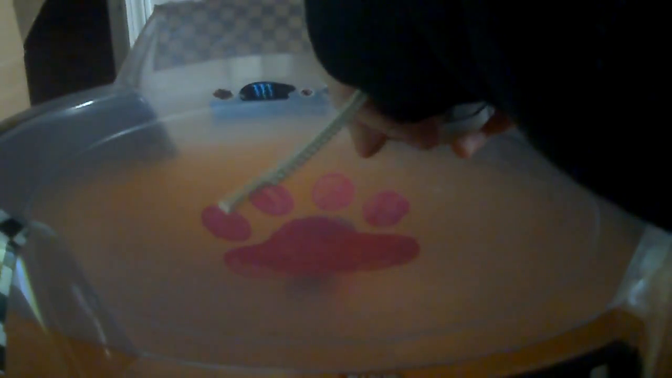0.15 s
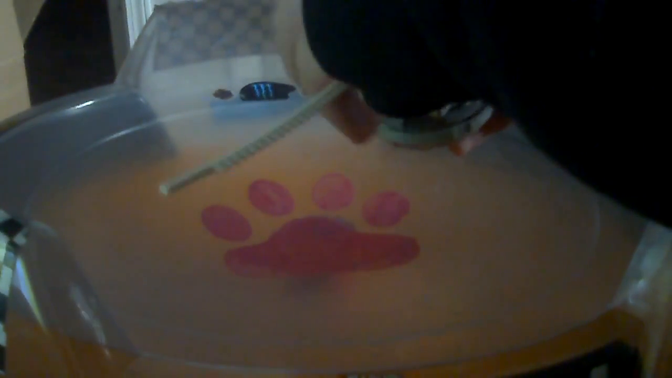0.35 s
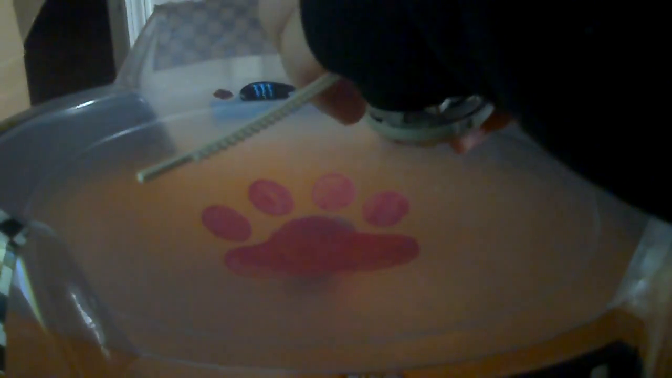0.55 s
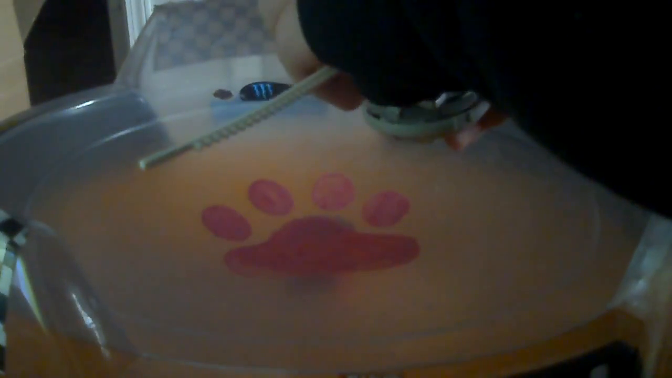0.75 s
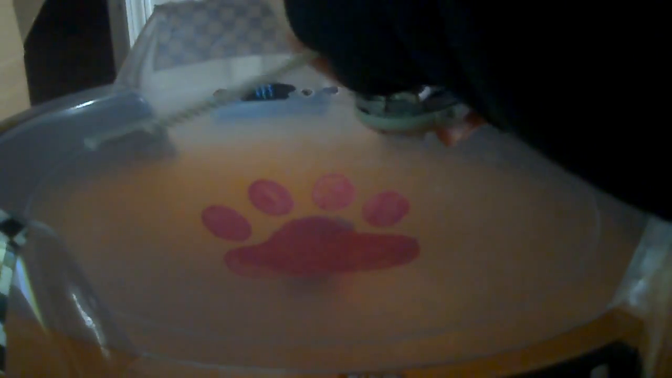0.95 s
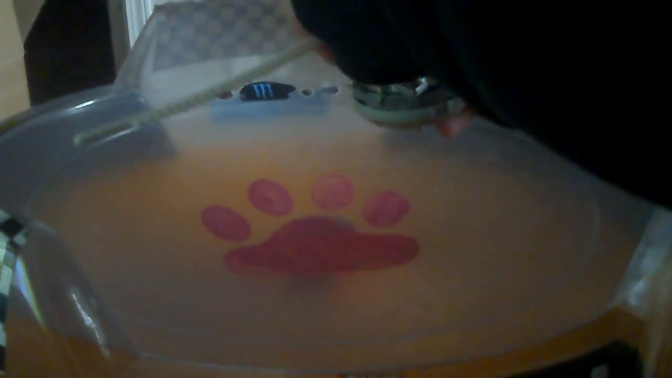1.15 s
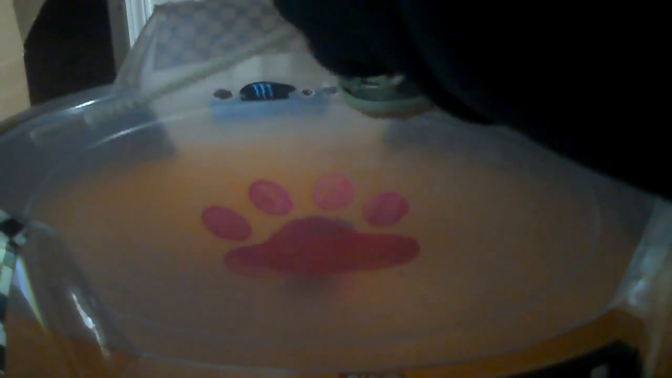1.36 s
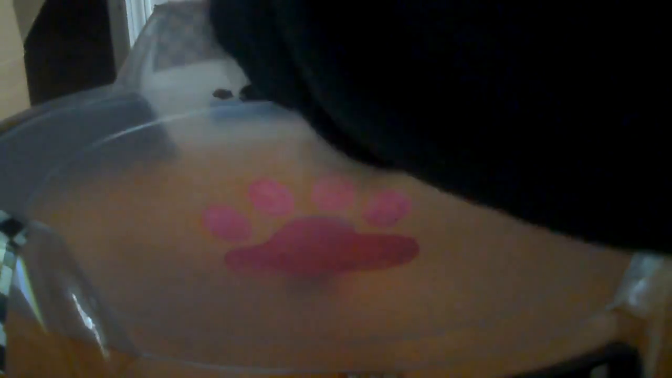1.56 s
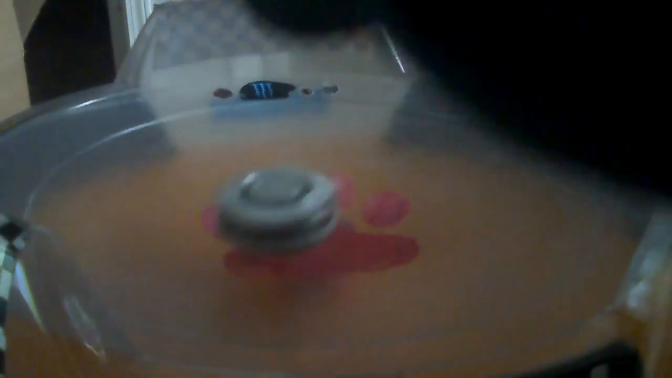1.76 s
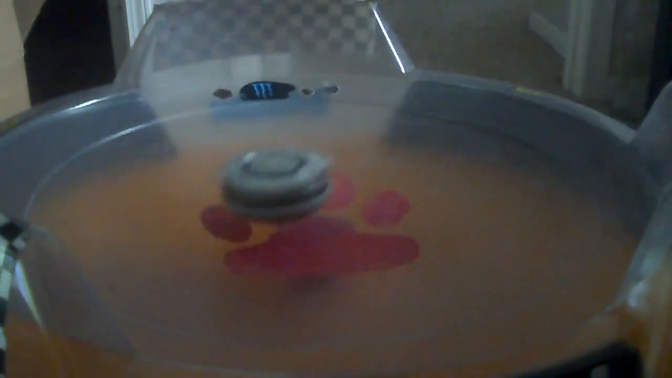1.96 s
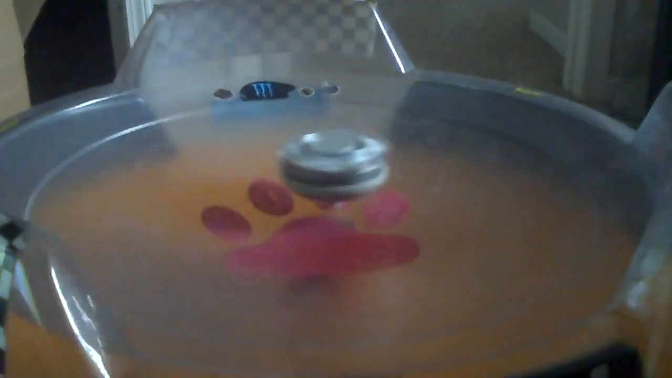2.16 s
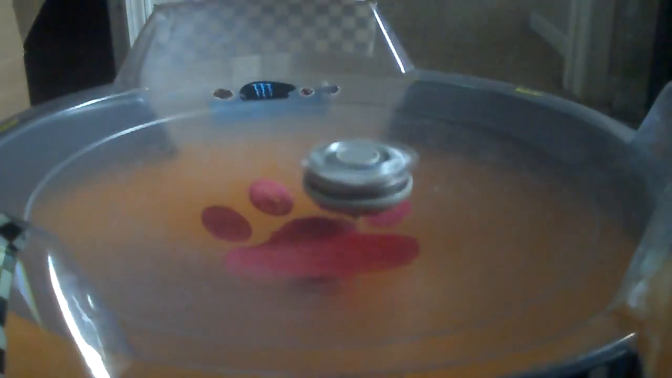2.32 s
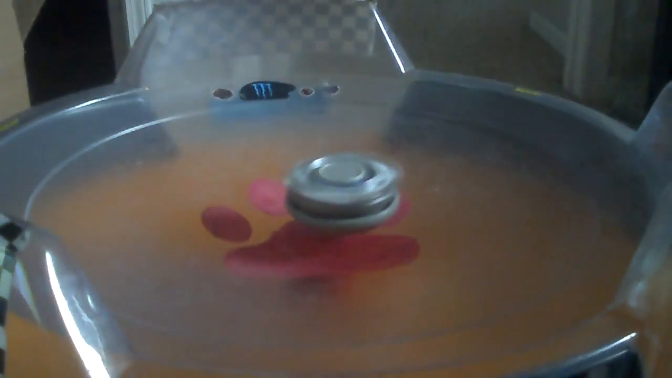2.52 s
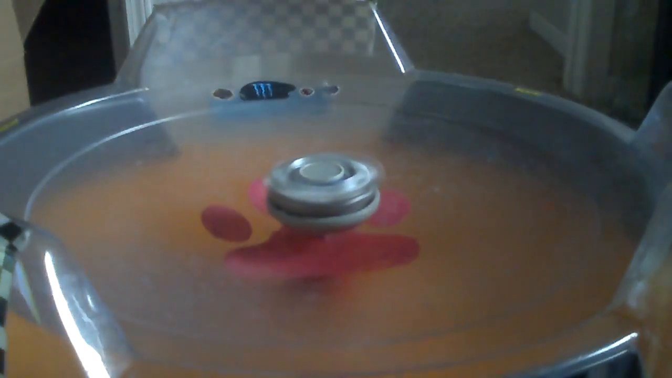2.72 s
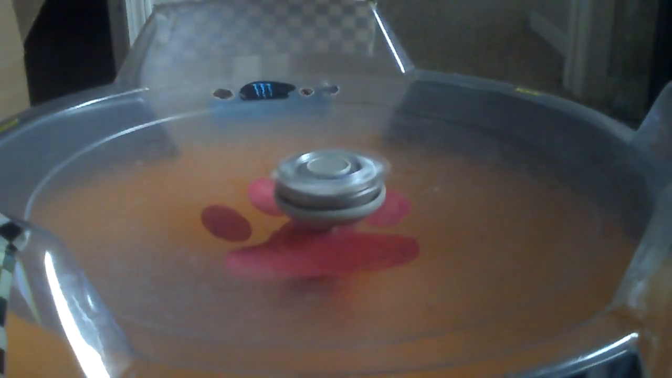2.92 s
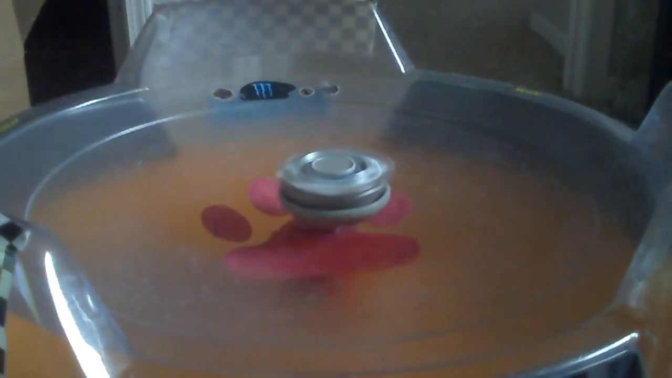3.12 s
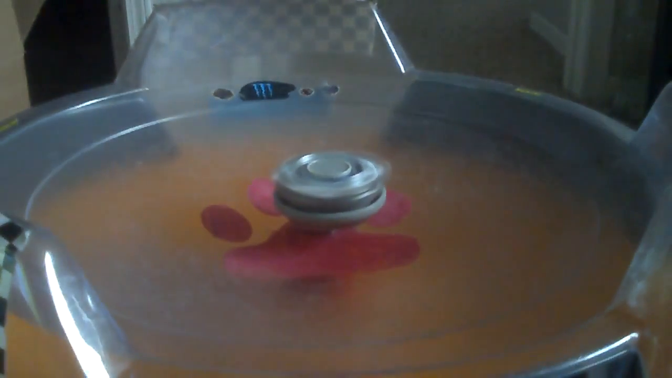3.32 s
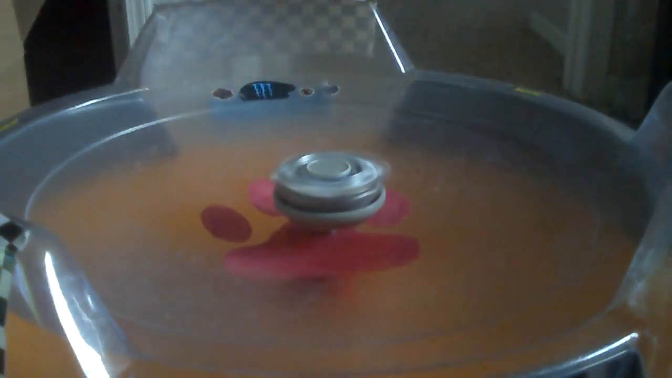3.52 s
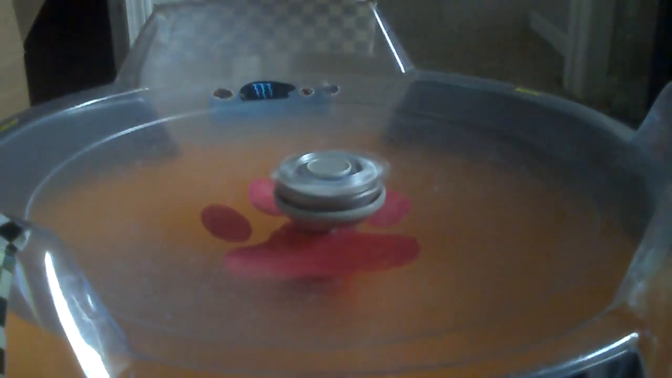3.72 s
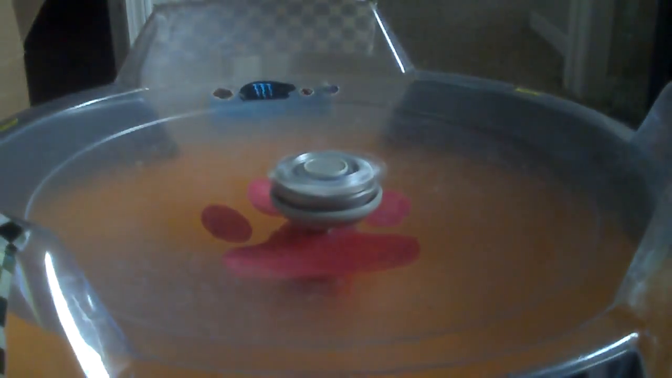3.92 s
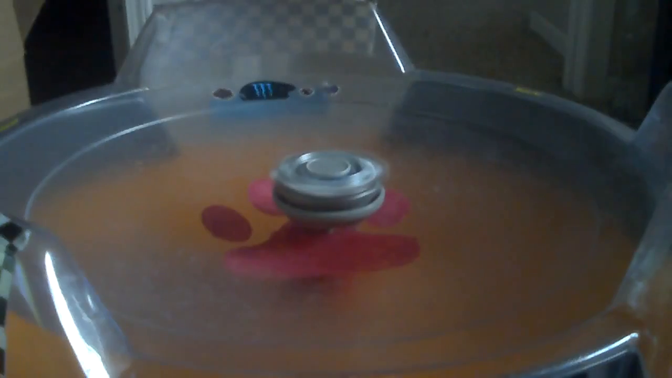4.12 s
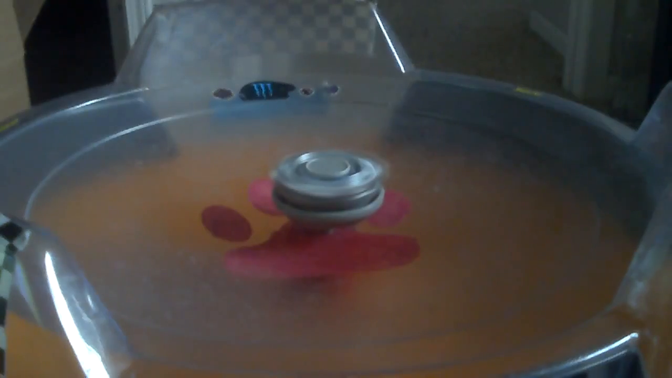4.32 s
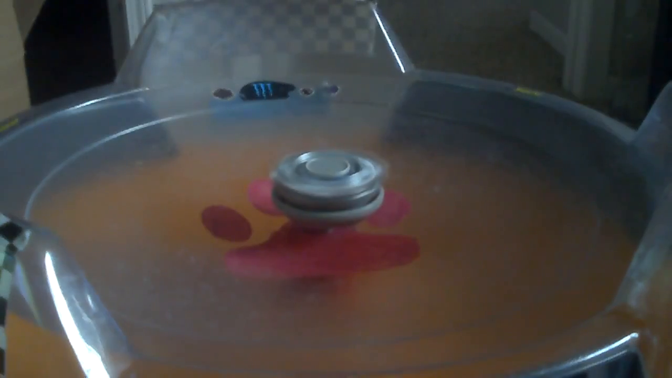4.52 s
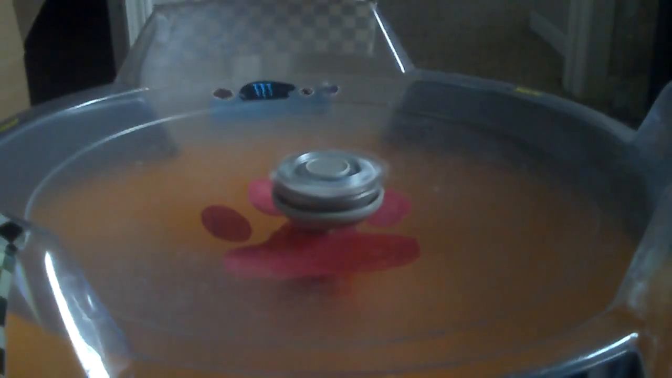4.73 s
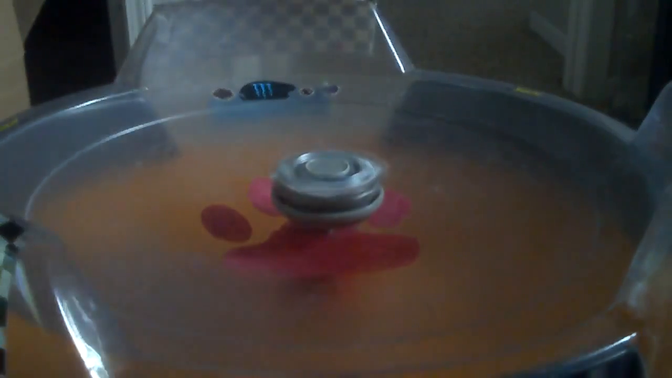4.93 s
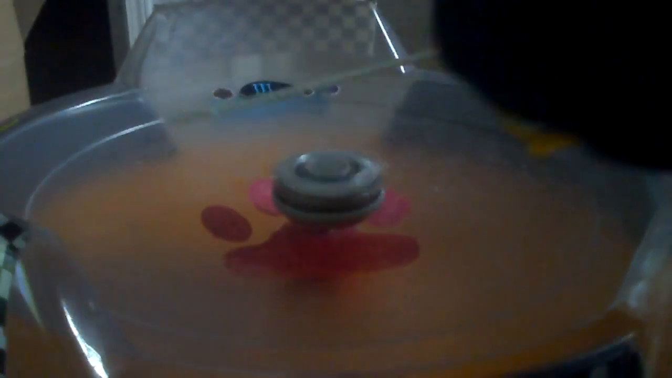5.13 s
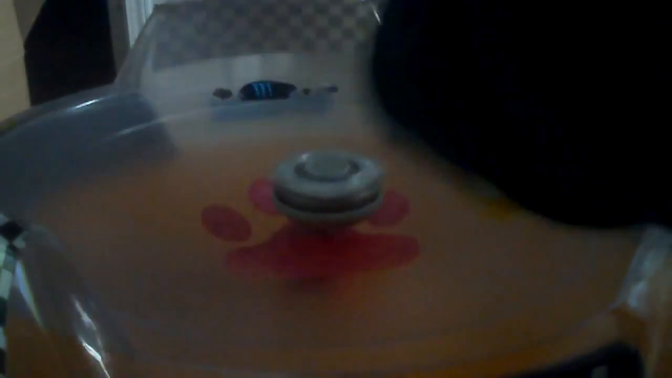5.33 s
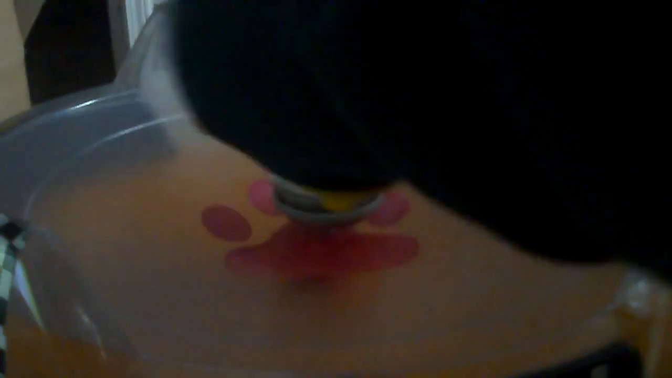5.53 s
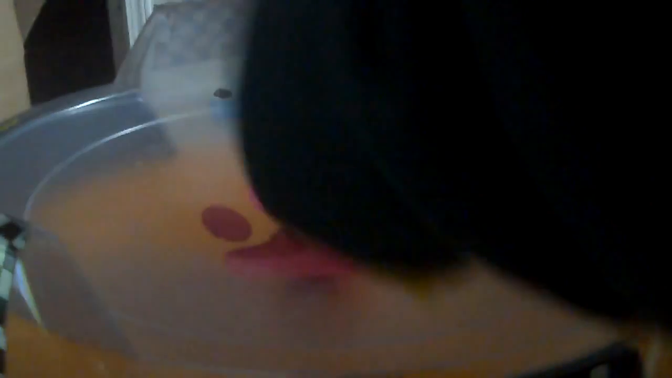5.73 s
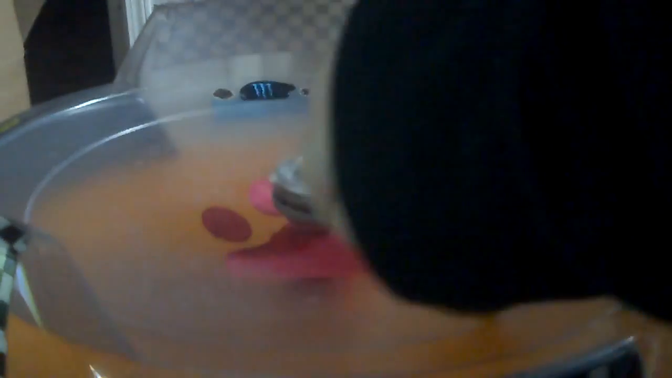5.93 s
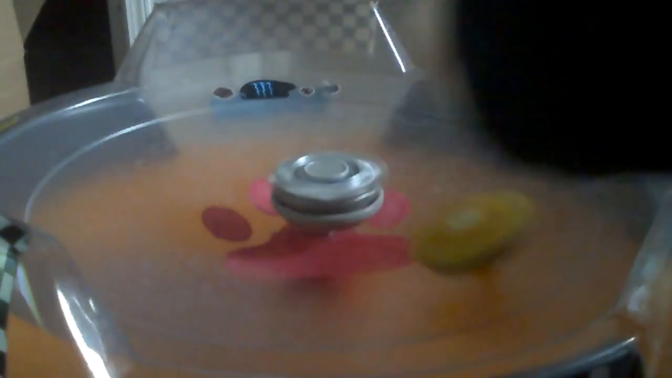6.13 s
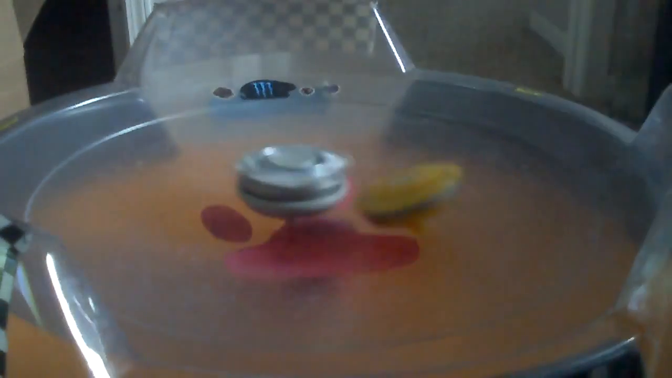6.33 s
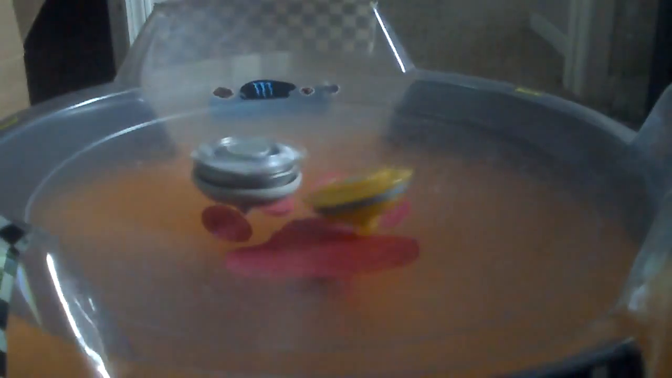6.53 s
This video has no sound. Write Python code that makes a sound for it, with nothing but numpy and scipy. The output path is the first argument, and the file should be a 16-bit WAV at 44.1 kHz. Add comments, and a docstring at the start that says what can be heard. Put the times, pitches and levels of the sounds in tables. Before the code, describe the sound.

Quiet indoor air, then a rising toothy zip and hard plastic clack as a spinning top drops into a hollow plastic arena. Bright rattling and low thumps settle into light hissing with rhythmic scrapes, quickening to a rough whirr. Small dull knocks pass nearby. A second ripcord pull and freewheeling gear lead to another, duller clatter and two brief hard clashes. The microphone is close, slightly harsh and hollow, with little echo.

```python
"""Quiet room air with mains hum, then small clicks of plastic launchers close to the microphone.
A ripcord zips; a toy top lands in a thin plastic dish, clatters and rocks, then scrapes once a lap,
faster and faster. A second launcher whirrs, its top clatters into the dish, and the two clash twice.
Shaped noise makes the friction, rattle and knocks; decaying modes make dish, tops and housing ring."""
import sys
import numpy as np
from scipy import signal
from scipy.fft import rfft, irfft
from scipy.io import wavfile

SR = 44100
rng = np.random.default_rng(int(sys.argv[2]) if len(sys.argv) > 2 else 0)


def materialize(psi):
    """Save the field psi as 16-bit PCM at rate SR to the path in sys.argv[1].

    A 1-D psi becomes a single channel; in a 2-D psi each row is a channel.
    """
    bounded = np.clip(np.atleast_2d(psi).T, -1, 1)
    quanta = np.round(bounded * 32767).astype(np.int16)
    wavfile.write(sys.argv[1], SR, quanta)


N = 289737
TIME = np.arange(N) / SR

# The first top's spin. Each row: time in seconds, turns per second.
SPIN = [(1.7, 82), (2.2, 77), (2.44, 70), (2.8, 68), (6.57, 74)]
# Laps of the scrape. Each row: time in seconds, laps per second.
LAPS = [(2.609, 6.01), (2.95, 11.4), (3.35, 17.04), (3.7, 20.29), (4.2, 26.42), (4.7, 31.88), (5.37, 38.17),
        (6.57, 44.0)]
# Modes of the dish. Each row: frequency in Hz, relative energy in dB, t60 in seconds.
DISH_MODES = [(82, -35.5, .12), (143.1, 0.5, 0.31), (169.4, -4, 0.39), (217.4, -1, 0.34),
              (302.4, -8.5, 0.2), (343, -7, 0.17), (380, -8.5, 0.35), (433.3, -2, 0.12),
              (465.3, -0.5, 0.18), (508.3, 1.5, 0.17), (540, -4.5, 0.14), (617, -8.5, 0.13),
              (696, -4.5, 0.18), (766, -9, 0.11), (936, -5, 0.091), (1016, -4.5, 0.023), (1118, -14, 0.42)]
# Modes of a top's body. Each row: frequency in Hz, relative energy in dB, t60 in seconds.
TOP_MODES = [(3150, 0, 0.03), (5260, 4, 0.023), (5730, -3, 0.0075), (7000, -17, 0.047), (8900, -22, 0.012),
             (10250, -10, 0.013)]
# Colour of the dish's dense wash and thump. Each row: frequency in Hz, relative density in dB per Hz.
SHELL_COLOUR = [(25, -22), (55, -32), (90, 0.5), (140, 7.5), (260, -3), (500, 10), (800, -12.5), (1100, 1),
                (1300, -3), (2200, -3), (4000, -34)]
# Bright clatter of the heavy top. Each row: frequency in Hz, relative density in dB per Hz.
HEAVY_CLATTER = [(700, 0.5), (1900, -3), (4400, 1.5), (5600, 9.5), (7000, 7), (9800, 4.5), (12000, -11),
                 (15000, -20)]

# the first, heavy top lands and rocks until upright; the light one lands and tumbles onto its tip
HEAVY_LANDS_S, UPRIGHT_S, LIGHT_LANDS_S, TUMBLE_ENDS_S = 1.7134, 2.4364, 5.9984, 6.105
REFERENCE_LAPS_PER_S = 30  # lap rate at which the hiss and scrape levels are given


def undb(db):
    """Decibels to gain."""
    return 10 ** (np.asarray(db) / 20)


def unit(x):
    """Scale to rms 1."""
    return x / np.sqrt(np.mean(x ** 2))


def loudness(rows, axis=1):
    """Gain along a dB column of a curve; silent outside it, but held if it reaches the end."""
    rows = np.array(rows)
    after = -140 if rows[-1, 0] < TIME[-1] - .1 else None
    return undb(np.interp(TIME, rows[:, 0], rows[:, axis], left=-140, right=after))


def cycles(rows):
    """Turns counted along a curve of rates, from its first row on."""
    rows = np.array(rows)
    rate = np.interp(TIME, rows[:, 0], rows[:, 1], left=0)
    return np.cumsum(rate) / SR


def ring(x, response):
    """Send x through a response scaled to unit energy."""
    return signal.fftconvolve(x, response / np.linalg.norm(response))[:len(x)]


def colour(x, points, size=2048):
    """Causal minimum-phase filter of unit energy, shaped through (Hz, dB) points."""
    hz, db = np.transpose(points)
    grid = np.maximum(np.fft.rfftfreq(size, 1 / SR), 1)
    level_db = np.interp(np.log(grid), np.log(hz), db)
    cepstrum = irfft(np.log(undb(level_db)))
    cepstrum[1:size // 2] *= 2  # fold the cepstrum forward in time
    cepstrum[size // 2 + 1:] = 0
    return ring(x, irfft(np.exp(rfft(cepstrum))))


def modes(rows):
    """Impulse response of decaying modes; dB sets the relative energy of each."""
    t = TIME[:SR // 2]
    out = np.zeros(len(t))
    for k, (hz, db, t60) in enumerate(rows):
        decay = np.exp(-np.log(1000) * t / t60)
        out += (-1) ** k * undb(db) / np.sqrt(t60) * np.sin(2 * np.pi * hz * t) * decay
    return out


def tail(t60):
    """Impulse response of many dense modes or reflections."""
    t = TIME[:SR // 2]
    return rng.standard_normal(len(t)) * np.exp(-np.log(1000) * t / t60)


def flutter(rate, spread_db):
    """A gain that wanders at random, rate steps a second, with mean power 1."""
    steps = np.interp(TIME * rate, np.arange(N), rng.standard_normal(N))
    return unit(undb(spread_db * steps))


def grit(spread_db):
    """Countless tiny contacts of uneven force, as noise."""
    return rng.standard_normal(N) * flutter(2000, spread_db)


def each_turn(turns, decay, scatter_db):
    """A contact that bites once a turn and lets go, a little different every time."""
    force = undb(scatter_db * rng.standard_normal(N))[turns.astype(int)]
    return unit(force * np.exp(-(turns % 1) / decay))


def bursts(rows, release):
    """Envelope of contacts (s, dB, length s) that hold for their length and die away."""
    power = np.zeros(N + SR)
    t = TIME[:SR // 10]
    for s, db, length in rows:
        start = int(s * SR)
        envelope = undb(db) * np.exp(-np.maximum(t - length, 0) / release)
        power[start:start + len(t)] += envelope ** 2
    return np.sqrt(power[:N])


def swell(start, until, attack, release, sag_db_per_s):
    """Envelope that rises, sags steadily while the motion lasts and then dies away."""
    t = TIME - start
    rise = np.clip(t / attack, 0, 1)
    sag = undb(-sag_db_per_s * np.maximum(t - attack, 0))
    return rise * sag * np.exp(-np.maximum(TIME - until, 0) / release)


def room():
    """Quiet room air, as slowly wavering coloured noise, with a sine of mains hum."""
    # Room air. Each row: frequency in Hz, relative density in dB per Hz.
    air_colour = [(25, -71), (90, -6), (160, -1.5), (240, 3), (400, -4), (1000, -8.5), (1400, -13.5),
                  (1950, -14), (2400, -19), (5000, -23.5), (15000, -25.5)]
    air_db, hum_hz, hum_db = -50.5, 59.8, -57.5
    air = colour(rng.standard_normal(N), air_colour) * flutter(7.3, spread_db=1.44)
    hum = np.sqrt(2) * np.sin(2 * np.pi * hum_hz * TIME)
    return undb(air_db) * air + undb(hum_db) * hum


def launchers():
    """Clacks, ripcord pulls, freewheeling gear and a short plastic slide; the housing rings with them."""
    # Clicks and clacks. Each row: start in seconds, relative level in dB.
    clack_rows = [(0.294, -48.5), (1.2518, -40), (1.487, -42), (1.508, -36.5), (1.639, -1.5), (1.6703, -5),
                  (5.4006, 0.5), (5.407, 0.5), (5.4254, -4.5), (5.448, -8.5), (5.4819, -4.5), (5.4974, -7)]
    # Two ripcord pulls, each with rows: time in seconds, teeth per second, relative level in dB.
    pulls = [
        [(1.55, 338, -44), (1.59, 556, -26), (1.625, 710, -19.5), (1.66, 1010, -13.5), (1.68, 2370, -14),
         (1.7, 1220, -22.5), (1.74, 2300, -29.5), (1.79, 2900, -37)],
        [(5.33, 420, -37), (5.37, 780, -23.5), (5.41, 1160, -19), (5.45, 1060, -19.5), (5.5, 780, -30),
         (5.54, 2000, -53)],
    ]
    # The second launcher freewheels, top still on. Each row: time in seconds, relative level in dB.
    freewheel = [(5.4, -32), (5.45, -34), (5.58, -25), (5.72, -34.5), (5.85, -26.5), (5.99, -31.5),
                 (6.02, -35)]
    # Plastic slides on plastic. Each row: time in seconds, level in dB.
    slide_rows = [(3.1, -67), (3.17, -38), (3.222, -37.5), (3.243, -28), (3.28, -27), (3.3, -37.5),
                  (3.335, -30), (3.38, -73)]
    # Modes of the housing. Each row: frequency in Hz, relative energy in dB, t60 in seconds.
    housing_modes = [(1482, 9, 0.025), (1760, -1.5, 0.0084), (3420, -21, 0.035), (4190, 5.5, 0.024)]
    # Modes of a small catch. Each row: frequency in Hz, relative energy in dB, t60 in seconds.
    catch_modes = [(1870, 0, .03), (2170, -6, 0.028)]
    # Colours of whirr, clacks and slide. Each row: frequency in Hz, relative density in dB per Hz.
    whirr_colour, clack_colour, slide_colour = [(200, -21), (700, -17), (1200, -8), (1500, 10.5),
                                                (2000, 0.5), (2500, -2), (3400, -2), (4350, 7.5),
                                                (4900, -0.5), (6500, -10), (10500, -2.5), (14000, -33)], [(150, 3), (700, -11.5), (1200, -4),
                                                               (1900, 10.5), (2600, 1), (3400, 11),
                                                               (5600, 10.5), (7500, 7.5), (9500, 5),
                                                               (11500, -1), (15000, -23)], [(500, -23), (900, -3),
                                                                                (1300, 2.5), (2400, -9.5),
                                                                                (3500, -7.5), (5000, 3.5),
                                                                                (7000, -2.5), (8500, 6.5),
                                                                                (10000, -10), (14000, -29)]
    freewheel_hz, catch_max_db = 82.8, -39.5

    rotation = unit(.15 + each_turn(TIME * freewheel_hz, decay=.25, scatter_db=1.5))
    whirr = grit(spread_db=2.5) * rotation * loudness(freewheel)
    clacks = grit(spread_db=2) * bursts([(s, db, .003) for s, db in clack_rows], release=0.0037)
    slide = grit(spread_db=0.5) * flutter(90, spread_db=5.5) * loudness(slide_rows)
    housing = ring(undb(2.5) * whirr + undb(-17.5) * clacks, modes(housing_modes))
    direct = undb(3.5) * colour(whirr, whirr_colour) + undb(-9) * colour(clacks, clack_colour)
    # the catch rings with every clack, up to a limit
    catch_rows = [(s, min(db, catch_max_db), .002) for s, db in clack_rows]
    flicks = grit(spread_db=2) * bursts(catch_rows, release=.002)
    catch = undb(-5.5) * ring(flicks, modes(catch_modes))
    return sum(ripcord(pull) for pull in pulls) + housing + catch + direct + colour(slide, slide_colour)


def ripcord(pull):
    """The cord's teeth zip over the pinion: a rough gliding note that breaks up into rattle."""
    # Gear teeth under the cord. Each row: frequency in Hz, relative density in dB per Hz.
    gear_colour = [(200, -14), (700, -1), (1200, 0), (1950, 4.5), (2900, 1), (4400, 7), (5600, 7.5),
                   (9500, 4.5), (11500, -4), (15000, -23)]
    teeth = cycles(pull) + .35 * np.log(flutter(300, spread_db=2))  # uneven pulling
    passed = np.maximum(np.diff(np.floor(teeth), prepend=0), 0)
    clicks = unit(passed) * flutter(810, spread_db=8.5)
    rattle = grit(spread_db=3) * each_turn(teeth - teeth.min(), decay=.5, scatter_db=3)
    force = loudness(pull, axis=2)
    smooth_running = 1 / (1 + (force / undb(-16)) ** 2)  # hard pulling makes the teeth skip
    note = np.sin(2 * np.pi * teeth) * flutter(300, spread_db=4) * smooth_running
    contact = undb(-9.5) * (clicks - clicks.mean()) + undb(-3.0) * rattle
    return colour(contact * force, gear_colour) + undb(-11.5) * note * force


def dish(force, dense_db, dense_t60):
    """The thin dish answers with its clear modes and a short wash of dense ones."""
    wash = colour(ring(force, tail(dense_t60)), SHELL_COLOUR)
    return ring(force, modes(DISH_MODES)) + undb(dense_db) * wash


def landings():
    """A top hits the dish: its spinning rim clatters while its weight thumps the plastic."""
    # Hard blows. Each row: start in seconds, relative levels of clatter and thud in dB, push in seconds.
    blow_rows = [(1.7134, -11, -7, 0.00034), (1.7165, -9, -2.5, 0.0029), (1.7833, -7, -32, 0.00084),
                 (1.8043, -7.5, -10.5, 0.001), (1.8124, -4.5, -24, 0.00063), (1.8711, -11, -11, 0.00096),
                 (1.9066, -8.5, -17.5, 0.00074), (1.9734, -11, -18, 0.0029), (1.9999, -11, -24.5, 0.00056),
                 (5.4154, -13, -18.5, 0.00089), (5.9984, -8.5, -11.5, 0.00049),
                 (6.1324, -28, -9.5, 0.00056)]
    # Dull clatter of the light top. Each row: frequency in Hz, relative density in dB per Hz.
    light_clatter = [(350, -16), (750, 12), (1100, 5.5), (1500, 5), (2400, -8), (4300, 11.5), (7000, -17),
                     (10500, 1.5), (12500, -7), (15000, -29)]
    blows = list(blow_rows) + bounces(count=8)
    push = np.zeros(N)
    for s, _, thud_db, length in blows:
        pulse = np.hanning(int(length * SR) + 3)  # a longer push gives a duller thud
        push[int(s * SR):][:len(pulse)] += undb(thud_db) * pulse / pulse.sum()
    light = TIME > LIGHT_LANDS_S
    rim = grit(spread_db=2.5) * bursts([(s, db, .004) for s, db, _, _ in blows], release=.003)
    clatter = undb(-7.5) * colour(rim * ~light, HEAVY_CLATTER)
    clatter += undb(-10.5) * colour(rim * light, light_clatter)
    push = push * np.where(light, undb(-4.0), 1)
    thump = dish(push, dense_db=2.0, dense_t60=0.038) + undb(-2) * colour(-push, SHELL_COLOUR)
    return clatter + undb(20.5) * thump


def bounces(count):
    """Blows of the light top's quick, uneven bounces: the clatter keeps its strength, the thuds fade."""
    gap_s, jitter_s, push_s = .0125, 0.00198, 0.0004
    clatter_db, thud_db, thud_sag_db_per_s, scatter_db = -2.5, -22, 170, 2
    late, hard, heavy = rng.standard_normal((count, 3)).T
    since = gap_s * (1 + np.arange(count)) + jitter_s * late
    clatter = clatter_db + scatter_db * hard
    thud = thud_db - thud_sag_db_per_s * since + scatter_db * heavy
    return list(zip(LIGHT_LANDS_S + since, clatter, thud, np.full(count, push_s)))


def running():
    """Tips chatter once a turn and make the dish rumble; the light top's tip also grinds."""
    # Colours of the tips' hiss and the light tip's grinding.
    # Each row: frequency in Hz, relative density in dB per Hz.
    hiss_colour, skid_colour = [(500, -26.5), (1000, -10.5), (1900, -5.5), (2600, -8.5), (3600, -2.5),
                                (4700, -2), (5500, 4), (7000, 4), (9000, 0), (10800, -4), (12000, -14),
                                (13300, -16), (15000, -35)], [(200, -19), (330, 10), (520, 11.5), (760, 9), (1050, -0.5),
                                              (1300, -36), (3300, 3), (5000, -32)]
    chatter = unit(.7 + each_turn(cycles(SPIN), decay=.18, scatter_db=2.5))
    friction, load = tip_forces()
    rough = grit(spread_db=2.5) * chatter * flutter(120, spread_db=1)
    hiss = colour(rough * friction, hiss_colour)
    light = TIME > LIGHT_LANDS_S
    rumble = dish(grit(spread_db=4.5) * load, dense_db=-2, dense_t60=0.041)
    skid = colour(grit(spread_db=2.5) * load * light, skid_colour)
    return hiss + undb(-1.5) * rumble + undb(-4.5) * skid


def tip_forces():
    """Friction and load on the dish: rocking, steady running and the light top's tumble add in power."""
    rock_hiss_db, rock_hiss_sag_db_per_s = -18.5, 41.5
    rock_load_db, rock_load_sag_db_per_s = -27, 20.5
    run_hiss_db, run_hiss_db_per_lap_rate, run_load_db = -31.5, 0.71, -47.5
    tumble_hiss_db, tumble_load_db = -10.5, -16.5
    light_load_db, light_load_sag_db_per_s = -28, 1

    def rocking(sag):
        """Rocking of the heavy top builds up, ebbs and stops."""
        return swell(HEAVY_LANDS_S, UPRIGHT_S, attack=0.2, release=0.037, sag_db_per_s=sag)

    tumble = swell(LIGHT_LANDS_S, TUMBLE_ENDS_S, attack=0.018, release=0.037, sag_db_per_s=58)
    heavy, light = TIME > HEAVY_LANDS_S, TIME > LIGHT_LANDS_S
    faster = lap_rate() - REFERENCE_LAPS_PER_S
    run_hiss = undb(run_hiss_db + run_hiss_db_per_lap_rate * faster) * heavy
    light_load = undb(light_load_db - light_load_sag_db_per_s * (TIME - LIGHT_LANDS_S)) * light
    hiss = [undb(rock_hiss_db) * rocking(rock_hiss_sag_db_per_s), run_hiss, undb(tumble_hiss_db) * tumble]
    load = [undb(rock_load_db) * rocking(rock_load_sag_db_per_s), undb(run_load_db) * heavy,
            undb(tumble_load_db) * tumble, light_load]
    return np.linalg.norm(hiss, axis=0), np.linalg.norm(load, axis=0)


def lap_rate():
    """Laps per second of the first top."""
    return np.interp(TIME, *np.transpose(LAPS))


def taps():
    """The wobbling top touches down lightly and its body rings."""
    # The clearest taps. Each row: start in seconds, relative level in dB.
    tap_rows = [(2.0762, -13), (2.1221, -12), (2.1974, -13), (2.2764, -14.5), (2.609, -23), (2.9223, -23.5),
                (3.1338, -22.5), (3.1582, -21), (4.0145, -14)]
    touches = list(tap_rows) + grazes()
    touch = grit(spread_db=1.5) * bursts([(s, db, .0015) for s, db in touches], release=.001)
    return undb(-13) * ring(touch, modes(TOP_MODES)) + undb(-8) * colour(touch, HEAVY_CLATTER)


def grazes():
    """The rocking rim grazes the dish once a turn, ever more lightly, until the top stands upright."""
    from_s, graze_db, sag_db_per_s, scatter_db = 1.79, -15.5, 6.5, 2.5
    turns = cycles(SPIN)
    first, last = np.interp([from_s, UPRIGHT_S], TIME, turns)
    times = np.interp(np.arange(last, first, -1), turns, TIME)
    scatter = scatter_db * rng.standard_normal(len(times))
    levels = graze_db - sag_db_per_s * (times - from_s) + scatter
    return list(zip(times, levels))


def scraping():
    """Once a lap the contact swells to a short scrape, then drags on weakly; the dish drones with it."""
    # Colours of the scrape and the drone. Each row: frequency in Hz, relative density in dB per Hz.
    grind_colour, drone_colour = [(600, -31), (800, -5), (1080, -8), (1280, -44), (1600, 9), (2050, 5.5),
                                  (2400, -7.5), (2850, 5.5), (3400, -13.5), (4300, 18), (4750, -11),
                                  (5500, 11), (7000, 9.5), (11000, 2.5), (13200, -10), (15200, -53)], [(120, -26), (270, -13.5), (340, 0.5), (400, -2.5),
                                                 (450, -1.5), (530, -4.5), (590, -13), (720, -8),
                                                 (900, -31)]
    bite_s, drag_share, drag_laps = 0.0021, 0.24, 0.5  # half-width of a scrape; drag strength and decay
    scrape_db, scrape_db_per_doubling, scrape_max_db = -33, 8.5, -32.5

    laps = cycles(LAPS)
    lap = np.round(laps).astype(int)
    start, rate = LAPS[0][0], lap_rate()
    since = np.where(TIME < start, TIME - start, (laps - lap) / rate)  # seconds from the nearest scrape
    bite = np.exp(-(since / bite_s) ** 2)
    drag = np.exp(-(laps % 1) / drag_laps) * (TIME > start)
    force = undb(rng.standard_normal(N))[lap]
    level_db = scrape_db + scrape_db_per_doubling * np.log2(rate / REFERENCE_LAPS_PER_S)
    strength = undb(np.minimum(level_db, scrape_max_db))
    contact = unit(bite + drag_share * drag) * force * strength
    bright = rng.uniform(0.065, 0.43, N)[lap]  # each lap catches a different share of the hard rim
    grind = colour(grit(spread_db=2) * contact * np.sqrt(1 - bright), grind_colour)
    grind += colour(grit(spread_db=2) * contact * bite * np.sqrt(bright), HEAVY_CLATTER)
    drone = colour(ring(grit(spread_db=2) * contact, tail(.045)), drone_colour)
    ringing = ring(colour(grit(spread_db=2) * contact, drone_colour), modes(DISH_MODES))
    return grind + undb(-14.0) * drone + undb(-25.5) * ringing


def knocks():
    """Dull little knocks of the hand on plastic while the second launcher is made ready."""
    # Light knocks. Each row: start in seconds, relative level in dB.
    knock_rows = [(3.086, -37.5), (3.133, -35.5), (3.265, -38), (3.543, -33), (3.682, -25), (3.738, -32)]
    # Modes they ring. Each row: frequency in Hz, relative energy in dB, t60 in seconds.
    knock_modes = [(885, -6, 0.014), (1170, 0.5, 0.021), (1436, 0, 0.037), (1810, -8, 0.03)]
    envelope = bursts([(s, db, .002) for s, db in knock_rows], release=0.0017)
    return undb(1.5) * ring(grit(spread_db=5) * envelope, modes(knock_modes))


def nudge():
    """A soft push makes the dish shudder for a moment, as low coloured noise."""
    # The shudder. Each row: frequency in Hz, relative density in dB per Hz.
    shudder_colour = [(40, -16), (85, 3), (140, 3.5), (220, -7), (320, 1), (600, -15), (1500, -21),
                      (6000, -48)]
    force = swell(start=3.655, until=3.745, attack=0.015, release=0.011, sag_db_per_s=36)
    return undb(-34) * colour(grit(spread_db=3) * force, shudder_colour)


def clashes():
    """Toothed rims of the two tops meet in bursts of very fast knocks, and their bodies ring."""
    # Clashes. Each row: start in seconds, relative level in dB, length in seconds.
    clash_rows = [(6.3108, 2, .008), (6.4905, 2, .008)]
    # The rims' noise. Each row: frequency in Hz, relative density in dB per Hz.
    clash_colour = [(200, -12), (900, -7), (1900, -6.5), (2600, -6.5), (3400, 0), (4800, -4.5),
                    (6000, -2.5), (9300, 2.5), (11500, -6), (15000, -20)]
    rims = grit(spread_db=2) * bursts(clash_rows, release=.003)
    return undb(-8.5) * colour(rims, clash_colour) + undb(-23) * ring(rims, modes(TOP_MODES))


def scene():
    """All sources, heard from close by with a faint room tail."""
    toys = launchers() + landings() + running() + taps() + scraping() + knocks() + nudge() + clashes()
    echo = undb(-22) * ring(toys, tail(.25))
    return (toys + echo + room())[None]


def record(dry):
    """The microphone loses deep bass and its housing cuts hollows; peaks clip and the top is cut."""
    # Hollows in the response. Each row: frequency in Hz, width in Hz, depth from 0 to 1.
    hollows = [(3950, 760, .95), (6220, 260, .55), (7850, 820, .91), (12430, 750, .7)]
    low_cut_hz, top_cut_hz = 48, 15350
    dry = signal.sosfilt(signal.butter(2, low_cut_hz, "highpass", fs=SR, output="sos"), dry)
    for hz, width, depth in hollows:
        b, a = signal.iirpeak(hz, hz / width, fs=SR)
        dry = dry - depth * signal.lfilter(b, a, dry)
    top_cut = signal.ellip(8, .2, 70, top_cut_hz, fs=SR, output="sos")
    return signal.sosfilt(top_cut, np.clip(dry, -1, 1))


dry = scene()
out = record(dry)
materialize(out)
```